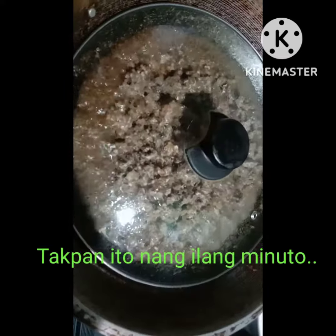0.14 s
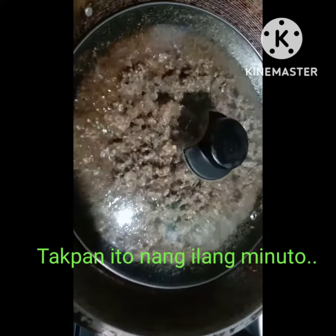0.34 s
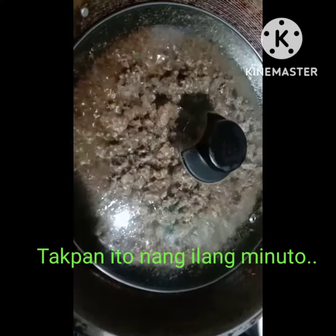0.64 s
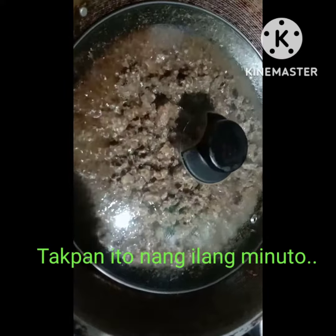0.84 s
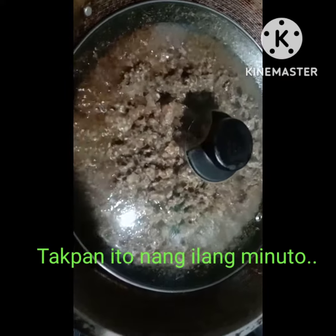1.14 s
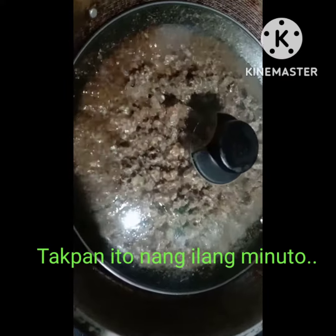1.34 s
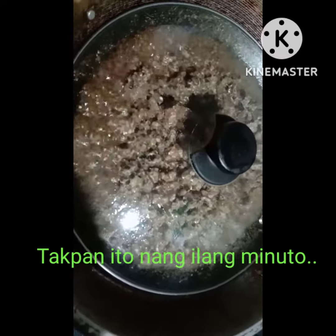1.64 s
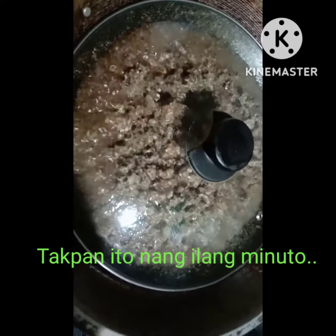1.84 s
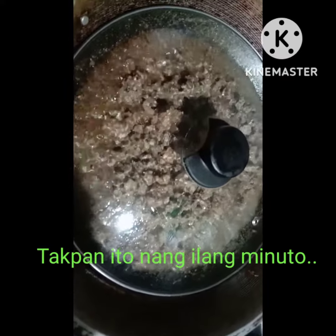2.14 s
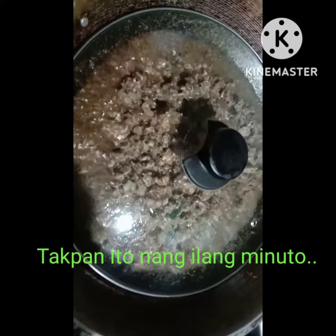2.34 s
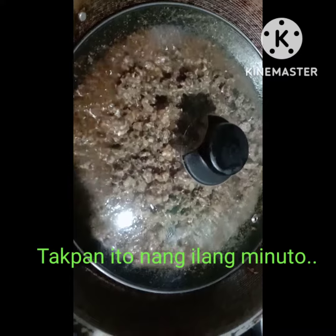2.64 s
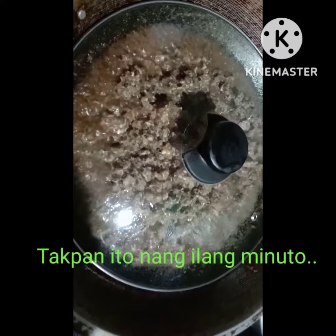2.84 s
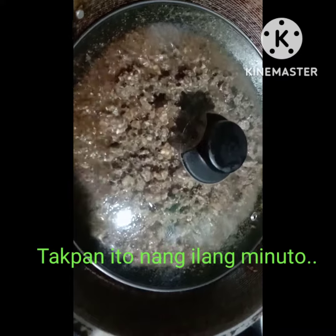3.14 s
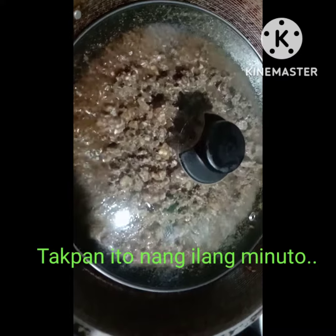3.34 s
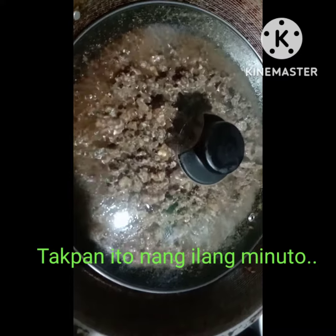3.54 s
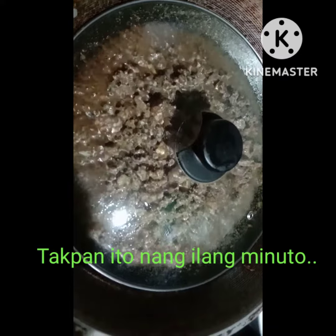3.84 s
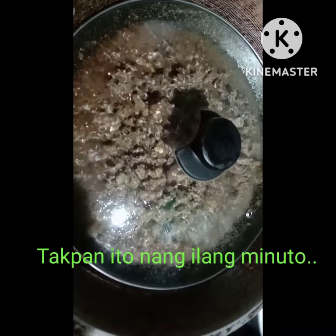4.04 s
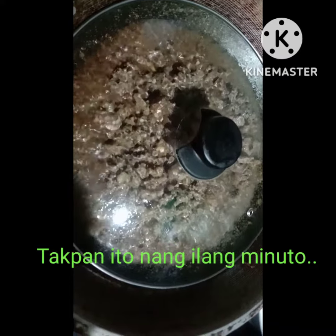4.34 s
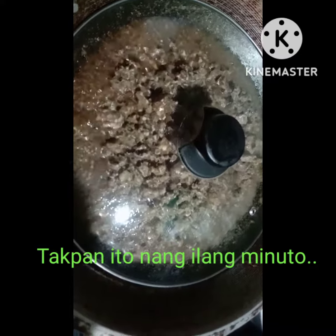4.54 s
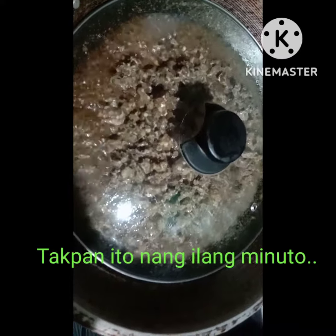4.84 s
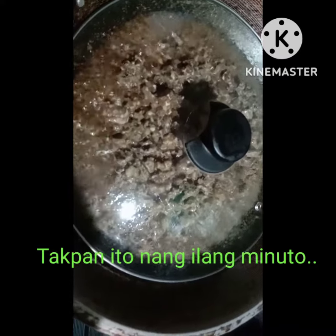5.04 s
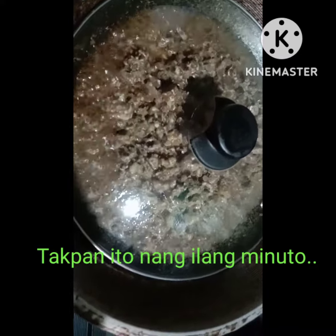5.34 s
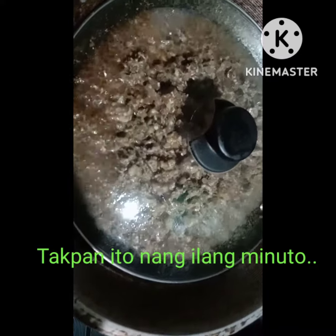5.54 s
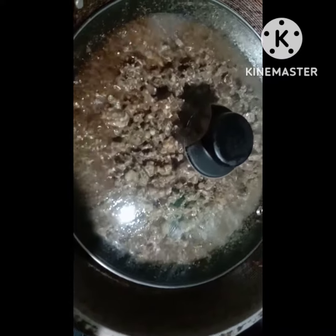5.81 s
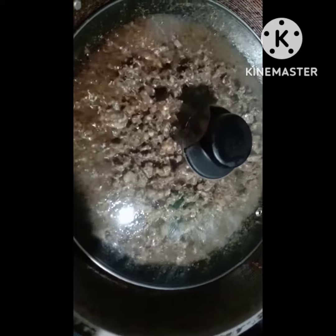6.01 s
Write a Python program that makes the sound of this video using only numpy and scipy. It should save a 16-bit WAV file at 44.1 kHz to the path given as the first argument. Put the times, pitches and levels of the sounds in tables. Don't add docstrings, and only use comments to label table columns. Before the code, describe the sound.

A covered pan of minced meat simmers close to a phone in a home kitchen for about six seconds. The sizzle is continuous, fine-grained and ringing from air trapped under the lid, with thin, very high hiss at the rim, soft low bubbling and a quiet burner flutter. A loud, sharp fat pop comes at the very start. At 0.5 s a strong, dull knock sounds from another part of the house, all echo, dying within half a second. Small spits click at 0.7, 1.2, 1.8 and 2.2 s. A brighter strong knock arrives at 2.5 s. Faint splashy ticks at 3.2 s precede a softer knock at 3.3; drops spit around 3.7, with a low plop at 3.9. A firm knock follows at 4.3 s. At 5.4 s a bright pop coincides with a faint knock. From 5.8 s spits crowd together with a loud short pop, then tiny snaps near 6.1 as the hiss rises slightly.

```python
import sys
import numpy as np
from scipy import signal
from scipy.fft import rfft, irfft, next_fast_len
from scipy.io import wavfile
from scipy.ndimage import uniform_filter1d, map_coordinates

SR = 44100
rng = np.random.default_rng(int(sys.argv[2]) if len(sys.argv) > 2 else 0)


def voltage_ratio(decibels):
    exponent = np.asarray(decibels, float) / 20
    return 10 ** exponent


def master_out(mix):
    frames = np.transpose(np.atleast_2d(mix))
    ceiling = np.clip(frames, -1, 1)
    pcm = np.round(ceiling * 32767).astype(np.int16)
    wavfile.write(sys.argv[1], SR, pcm)


N = 272097
TIME = np.arange(N) / SR


def unit(x):
    return x / np.sqrt(np.mean(x ** 2) + 1e-20)


def along(points, hz):
    f, level_db = np.transpose(points)
    return voltage_ratio(np.interp(np.log(hz + 1), np.log(f + 1), level_db))


def peaks(modes, hz):
    return np.sqrt(sum(voltage_ratio(2 * db) / (1 + (2 * (hz - c) / w) ** 2) ** 2 for c, w, db in modes))


def coloured(x, gain):
    size = next_fast_len(len(x) + 8192, real=True) // 2 * 2
    cepstrum = irfft(np.log(gain(np.fft.rfftfreq(size, 1 / SR)) + 1e-6), size)
    cepstrum[1:size // 2] *= 2
    cepstrum[size // 2 + 1:] = 0
    return irfft(rfft(x, size) * np.exp(rfft(cepstrum)), size)[:len(x)]


def curves(rows):
    s, *columns = np.transpose(rows)
    return [np.interp(TIME, s, c) for c in columns]


def wobble(rate):
    return map_coordinates(rng.standard_normal(int(N * rate / SR) + 4), [TIME * rate])


def crackle(rate, spread_db, share, size=N):
    size_db = spread_db * np.minimum(rng.exponential(size=size), 3)
    bursts = (rng.random(size) < rate / SR) * voltage_ratio(size_db) * rng.uniform(-1.16, 1, size)
    share = np.clip(share, 0, 1)
    return np.sqrt(share) * unit(bursts) + np.sqrt(1 - share) * rng.standard_normal(size)


def patchy(x, depth_db):
    z = signal.stft(x, nperseg=256)[2]
    field = rng.standard_normal(z.shape)
    field = uniform_filter1d(uniform_filter1d(field, size=4, axis=0), size=16, axis=1)
    return signal.istft(z * voltage_ratio(depth_db * unit(field)), nperseg=256)[1][:N]


def warming(x):
    rise_per_s = 0.005
    return map_coordinates(x, [SR * TIME * (1 + rise_per_s * (TIME - TIME[-1]) / 2)], order=4)


# (centre [Hz], width [Hz], level [dB])
LID_MODES = [(1238, 124, 1), (1882, 165, -6), (2570, 320, -4.5), (2870, 99, -8.5), (3200, 530, -3),
             (3856, 700, -8.5), (4470, 120, -12), (5140, 130, -10.5), (5360, 44, -8), (5782, 230, -1.5),
             (6300, 260, 0), (6997, 260, 0), (7480, 360, -3.5)]
# (frequency [Hz], level [dB])
RIM_LEAK = [(500, -47), (900, -23), (1600, -23), (2200, -14), (4200, -15.5), (6600, -7.5), (8200, -16),
            (9500, -32.5), (11000, -38.5)]
# (centre [Hz], width [Hz], level [dB])
NOTCHES = [(913, 85, -11), (1477, 244, -5.5), (4136, 176, -9), (4270, 124, -9.5), (4880, 120, -5.5),
           (6590, 240, -5.5), (7490, 120, -2)]


def lid(hz):
    cancel_db = sum(db / (1 + (2 * (hz - c) / w) ** 2) for c, w, db in NOTCHES)
    return np.hypot(peaks(LID_MODES, hz), along(RIM_LEAK, hz)) * voltage_ratio(cancel_db)


# (time [s], spray level [dB])
HEAT = [
    (0.0, -61.5),
    (1.18, -61),
    (1.49, -62),
    (3.44, -59.5),
    (5.67, -61.5),
    (6.17, -57.5),
]
# (frequency [Hz], density [dB per Hz])
SPRAY = [(7000, -36), (8500, -38), (9300, -4), (11200, -3.5), (11800, -18), (13600, -9), (14400, 0),
         (15000, 9), (15500, 10), (16500, -17)]
# (centre [Hz], width [Hz], level over the spray [dB])
RIM_MODES = [(8080, 80, -1), (8650, 100, -5), (9300, 110, 2), (9850, 100, 8), (10430, 110, 6),
             (11230, 130, 1.5), (11650, 90, 7)]


def simmer():
    spray_db, = curves(HEAT)
    sizzle_db = -41 + 0.21 * (spray_db - spray_db.mean())
    fat = patchy(crackle(2000, spread_db=0.0, share=0.28), depth_db=1.23)
    drops = patchy(crackle(500, spread_db=0.5, share=0.21), depth_db=0.8)
    rim = coloured(drops + 0.21 * fat, lambda hz: np.hypot(1, peaks(RIM_MODES, hz)) * (hz < 16500))
    spray = coloured(warming(rim), lambda hz: along(SPRAY, hz))
    spray = unit(spray * voltage_ratio(1.5 * wobble(33) + 1.2 * wobble(70)))
    sizzle = unit(warming(coloured(fat, lid)))
    return voltage_ratio(sizzle_db + 0.31 * wobble(13)) * sizzle + voltage_ratio(spray_db + 1.5) * spray


def bubbles(count, pitch_hz, scatter, cycles):
    when, pitch, size = rng.random(count), rng.standard_normal(count), rng.standard_normal(count)
    hz, t = (pitch_hz * np.exp(scatter * pitch))[:, None], TIME[:SR // 12]
    age = t * hz / cycles
    swell = voltage_ratio(0.7 * size[:, None]) * age * np.exp(-3 * age)
    notes = swell * np.sin(2 * np.pi * hz * t * (1 + 0.046 * age))
    index = (when * N).astype(int)[:, None] + np.arange(len(t))
    return unit(np.bincount(index.ravel(), notes.ravel())[:N])


# (time [s], bubbling level [dB])
BOIL = [(0.0, -58.5), (1.05, -57.5), (1.29, -59.5), (1.82, -56), (2.32, -58), (2.68, -56.5), (3.06, -58),
        (3.81, -54.5), (4.86, -62), (5.48, -56), (5.81, -62.5), (6.17, -57.5)]
# (centre [Hz], width [Hz], level [dB])
JUICE_MODES = [(206, 37, -9.5), (344, 51, 1.5), (430.4, 50, -3), (515.6, 43, -5), (617, 97, -10)]
# (frequency [Hz], density [dB per Hz])
BURNER = [(15, -108), (25, -73), (43, -21), (79, -8), (102, 3), (156, -7.5), (194, -14), (260, -18),
          (340, -9), (570, -120)]


def pool():
    (bubbling_db,), (heat_db,) = curves(BOIL), curves(HEAT)
    burner_db = -60.5 - 0.6 * (bubbling_db - bubbling_db.mean()) + 0.7 * (heat_db - heat_db.mean())
    seethe = unit(coloured(rng.standard_normal(N), lambda hz: hz < 1100))
    boil = 0.54 * bubbles(count=600, pitch_hz=479.6, scatter=0.396, cycles=10.6) + 0.89 * seethe

    def pan(hz):
        return peaks(JUICE_MODES, hz) * (hz > 60) + voltage_ratio(-29.5) * (hz > 150) * (hz < 700)

    juice = coloured(patchy(boil, depth_db=3.0) * voltage_ratio(2.1 * wobble(26)), pan)
    flame = rng.standard_normal(N) * voltage_ratio(3.5 * wobble(22))
    burner = coloured(flame, lambda hz: along(BURNER, hz))
    return voltage_ratio(bubbling_db + 2.5) * unit(juice) + voltage_ratio(burner_db) * unit(burner)


# (frequency [Hz], density [dB per Hz])
WALLS = [(300, -29), (600, 1.5), (880, -2), (1050, -0.5), (1500, -0.5), (1800, -4), (2600, -34)]


def kitchen():
    linger_db, linger_t60_s = -36.5, 2.7
    bubbling_db, = curves(BOIL)
    murmur = voltage_ratio(-64.5 + 0.45 * (bubbling_db - bubbling_db.mean()))
    linger = sum((TIME > s) * voltage_ratio(db + linger_db - 60 * np.abs(TIME - s) / linger_t60_s)
                 for s, db, *_ in KNOCKS)
    steam = patchy(rng.standard_normal(N), depth_db=4.0)
    return np.hypot(murmur, linger) * unit(coloured(steam, lambda hz: along(WALLS, hz)))


# (time [s], peak level [dB], body level through the lid [dB])
SPITS = [(0.6794, -51, 7), (1.1772, -47, 1), (1.7938, -49, 10), (2.169, -48, 9), (3.687, -46, 4),
         (3.7289, -49, 10), (5.4135, -44, -2), (5.5179, -47, 8), (5.7944, -62, 1), (5.8416, -46, 2),
         (5.9144, -46, 10), (5.9564, -54, 10.5), (6.0302, -48, 4), (6.1113, -42, 1), (6.1474, -49, -14),
         (6.1644, -49, 11)]
# (time [s], rms level [dB], pitch [Hz], length [s])
POPS = [
    (.0071, -25.5, 3050, 0.003),
    (3.197, -38, 3300, 0.0011),
    (3.215, -37, 3000, 0.005),
    (5.3945, -34, 3200, 0.0023),
    (5.8409, -30, 3300, 0.0009),
    (6.1076, -34, 3320, 0.00071),
    (6.1203, -39, 3200, 0.0014),
    (6.139, -34, 3270, 0.00078),
    (3.878, -58, 770, 0.016),
]


def spits():
    bright, body, out, t = np.zeros(N), np.zeros(N), np.zeros(N + SR), TIME[:SR // 10]
    for s, db, body_db in SPITS:
        bright[round(s * SR)] = voltage_ratio(db + 5)
        body[round(s * SR)] = voltage_ratio(db + body_db + 10)
    for s, db, hz, length in POPS:
        ring_db = -12 + 2.5 * np.log2(length / 0.0034)
        ring_t60 = 200 / hz
        splash_modes = [(hz, 0.2 * hz, 0), (1.57 * hz, 0.2 * hz, -6),
                        (1.97 * hz, 0.47 * hz, -6), (4.8 * hz, 0.5 * hz, -28)]
        ring_modes = [(0.8 * hz, 0.07 * hz, 0)]
        noise = rng.standard_normal((2, len(t)))
        splash = unit(coloured(noise[0], lambda f: peaks(splash_modes, f)))[::-1]
        ring = unit(coloured(noise[1], lambda f: peaks(ring_modes, f)))
        gate = voltage_ratio(-60 * np.maximum(t - length, 0) / 0.0029)
        pop = gate * splash + voltage_ratio(ring_db - 60 * t / ring_t60) * ring
        out[round(s * SR):][:len(t)] += voltage_ratio(db) * pop
    click = coloured(bright, lambda hz: along(SPRAY, hz) + voltage_ratio(2) * (hz > 8000))
    answer = coloured(body, lambda hz: np.hypot(lid(hz), voltage_ratio(-4) * (hz > 2000) * (hz < 8500)))
    return out[:N] + click + answer


# (time [s], rms level [dB], brightness [dB per octave], spot [0 middle to 1 edge])
KNOCKS = [
    (.482, -23.5, -2.5, 0.02),
    (2.478, -24, 2, 0.97),
    (3.304, -31, 0.7, 0.98),
    (4.29, -27, 1, 1),
    (5.382, -35, 3, 1),
]
# (frequency [Hz], density [dB per Hz])
HOUSE = [(24, -75), (40, -46), (93, -13.5), (462, -13), (655, -6.5), (884, -10.5), (1000, -11), (1110, -7),
         (1220, -2.5), (1730, -9.5), (3000, -2.5), (4370, -17), (7200, -11), (11000, -36), (15600, -25)]
# (centre [Hz], width [Hz], level over the rest [dB])
STRUCK_MODES = [(561, 33, 12.5), (680, 32, 5.5), (1000, 21, 10.5), (1170, 190, -5), (1570, 110, -17),
                (2020, 50, 5), (2510, 35, 8), (2500, 95, -12), (3300, 120, -9), (5400, 57, -4),
                (5680, 50, 19.5)]
# (pitch [Hz], t60 [s], level struck in the middle [dB], level at the edge [dB])
LEAD_NOTES = [(768, 0.15, -8, -5), (1009, 0.19, -4, -6), (1247, 0.53, -3.5, -8), (1590, 0.14, -5, -8),
              (2478, 0.05, -11, 2), (2750, 0.11, -8, -18)]


def knocks():
    out, t = np.zeros(N + SR), TIME[:SR // 2]
    t60 = 0.4
    soft_db, soft_loss = -32.5, 3.2

    def low(hz):
        return 1 / (1 + (hz / 450) ** 4)

    def high(hz):
        return 1 / (1 + (4200 / (hz + 1)) ** 6)

    def swell(rise, t60, hold):
        return (1 - np.exp(-(t / rise) ** 2)) * voltage_ratio(-60 * (np.hypot(t, hold) - hold) / t60)

    for s, db, bright_db, spot in KNOCKS:
        thud_db = np.interp(spot, [0, 1], [-2.5, 11])
        build = np.interp(spot ** 3, [0, 1], [0.01, 0.014])
        echoes = crackle(3000, spread_db=-2.2, share=0.11, size=len(t))
        echoes = patchy(echoes, depth_db=1.5)[:len(t)]

        def colour(hz):
            tilt = voltage_ratio(bright_db * np.log2((hz + 300) / 2000))
            return along(HOUSE, hz) * tilt / (1 + (hz / 11000) ** 3)

        def band(gain):
            return coloured(echoes, lambda hz: colour(hz) * gain(hz))

        thud = voltage_ratio(thud_db) * swell(1.22 * build, 0.9 * t60, 0.022) * band(low)
        wide = swell(build, 1.03 * t60, 0.022) * band(lambda hz: (1 - low(hz)) * (1 - high(hz)))
        treble = voltage_ratio(0.73) * swell(build, 0.79 * t60, 0.055) * band(high)
        ring = voltage_ratio(-7) * swell(0.36 * build, 1.18 * t60, 0.0079) * band(lambda hz: peaks(STRUCK_MODES, hz))
        reverb = (thud + wide + treble + ring) / np.std(band(np.ones_like))
        boom = voltage_ratio(thud_db - 27.5) * swell(1.3 * build, t60, 0.021) * np.sin(2 * np.pi * 103 * t)
        drift = 0.074 * np.cumsum(rng.standard_normal((len(LEAD_NOTES), len(t))), axis=1)
        notes = np.zeros(len(t))
        for (hz, life, middle_db, edge_db), phase in zip(LEAD_NOTES, drift):
            note_db = middle_db + spot * (edge_db - middle_db)
            notes += voltage_ratio(note_db) * swell(0.0072, life, 0.009) * np.sin(2 * np.pi * hz * t + phase)
        notes *= voltage_ratio(soft_loss * min(db - soft_db, 0))
        out[round(s * SR):][:len(t)] += voltage_ratio(db - 0.14) * (reverb + notes + boom)
    return out[:N]


def scene():
    return (simmer() + pool() + kitchen() + spits() + knocks())[None]


def band_limit(x):
    return signal.sosfilt(signal.butter(12, 16630, fs=SR, output="sos"), x)


def record(dry):
    spectrum, hz = rfft(dry), np.fft.rfftfreq(N, 1 / SR)
    kept = irfft(spectrum * ((hz < 15500) / (1 + (22 / (hz + 1)) ** 2)), N)
    return band_limit(kept)


dry = scene()
out = record(dry)
master_out(out)
```